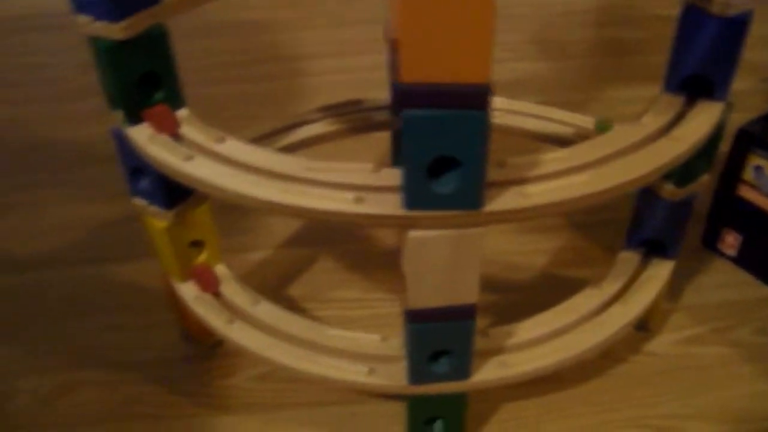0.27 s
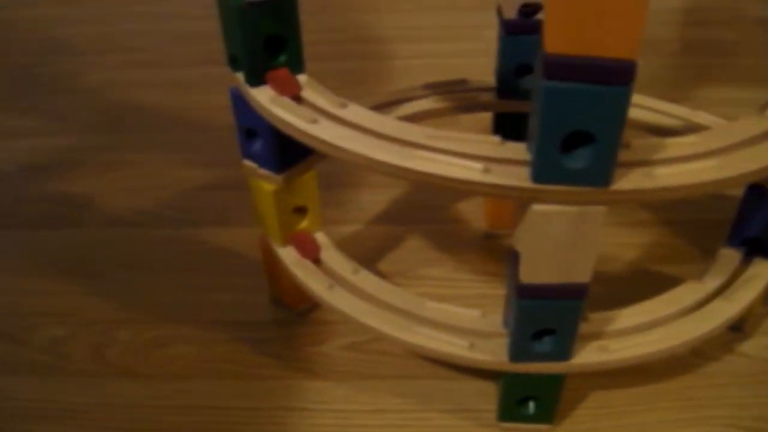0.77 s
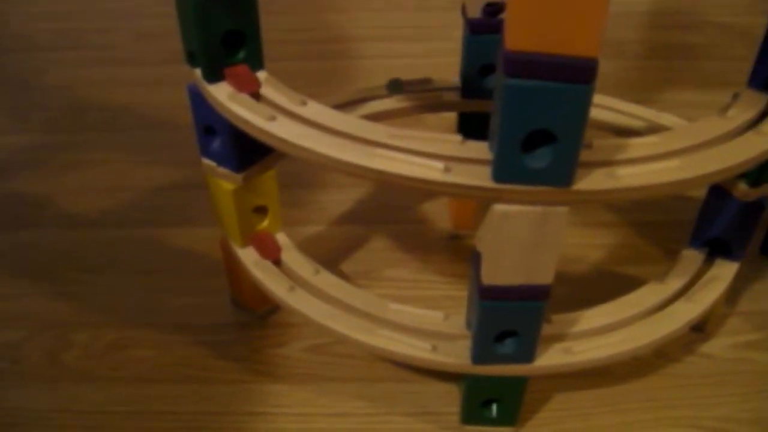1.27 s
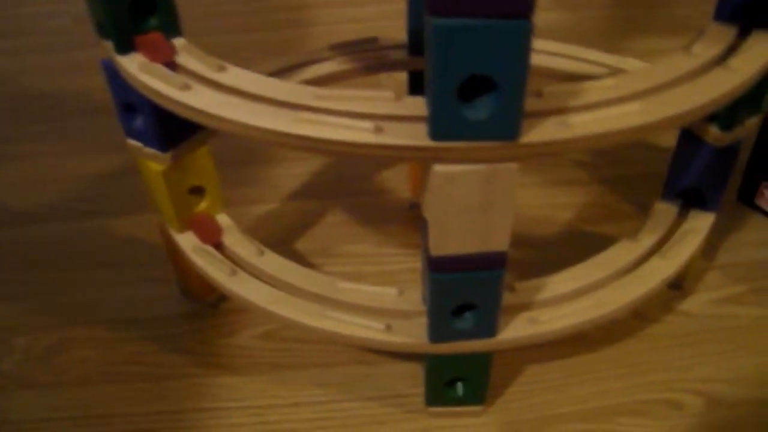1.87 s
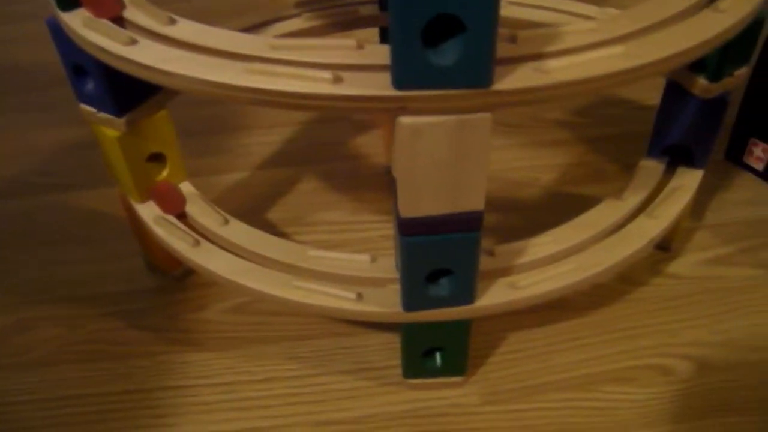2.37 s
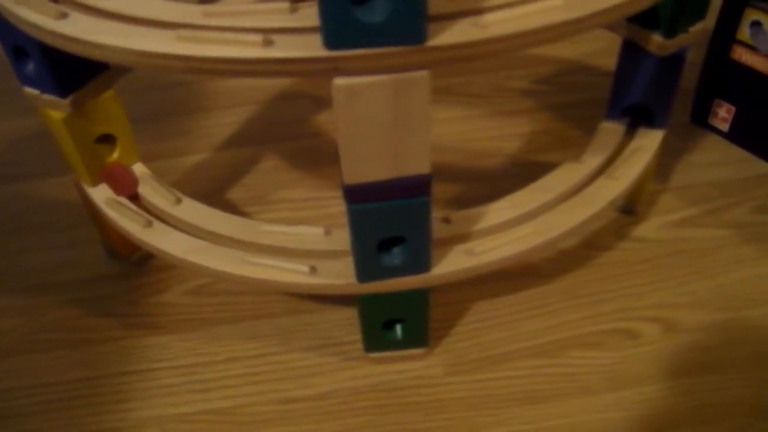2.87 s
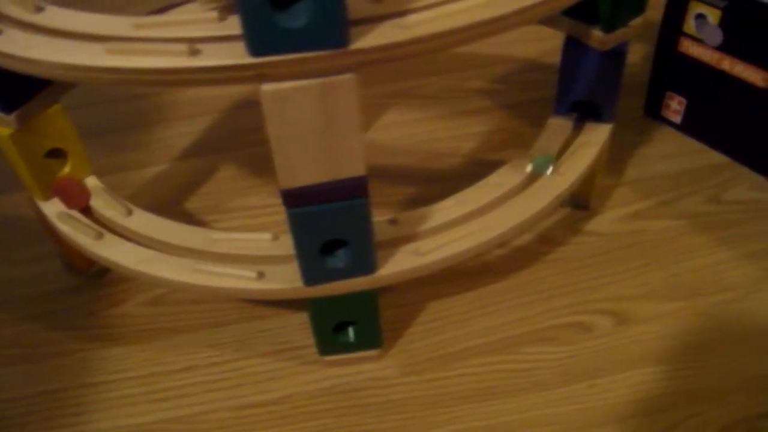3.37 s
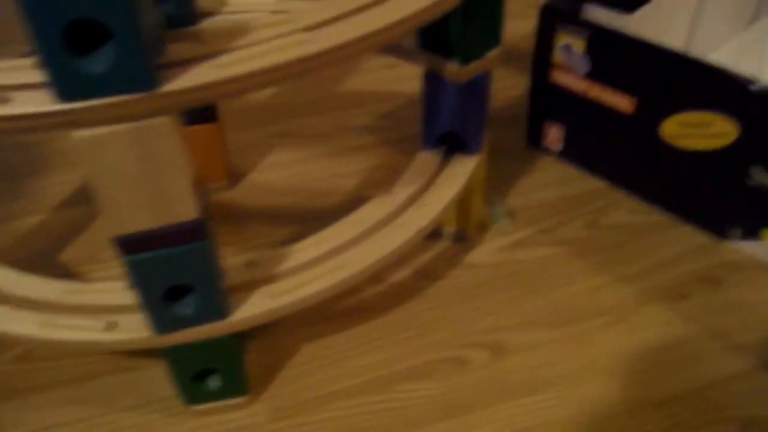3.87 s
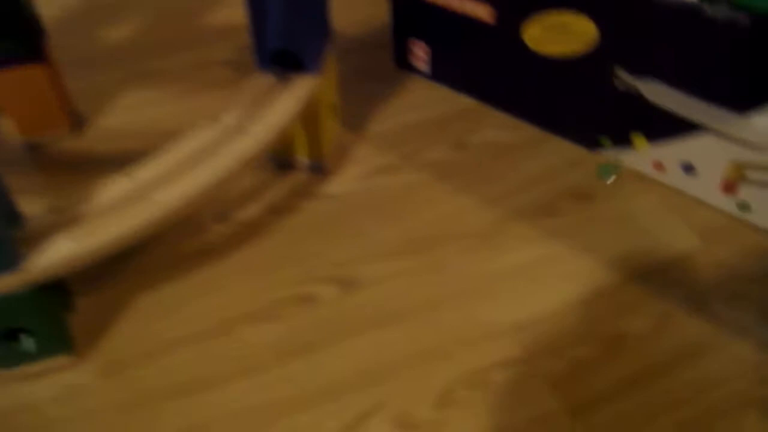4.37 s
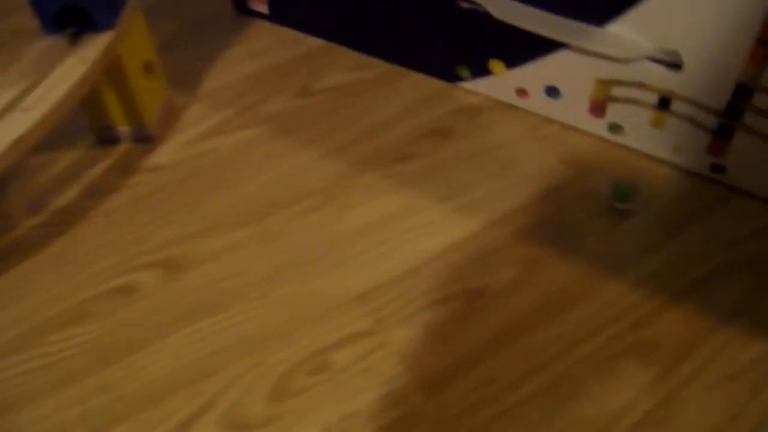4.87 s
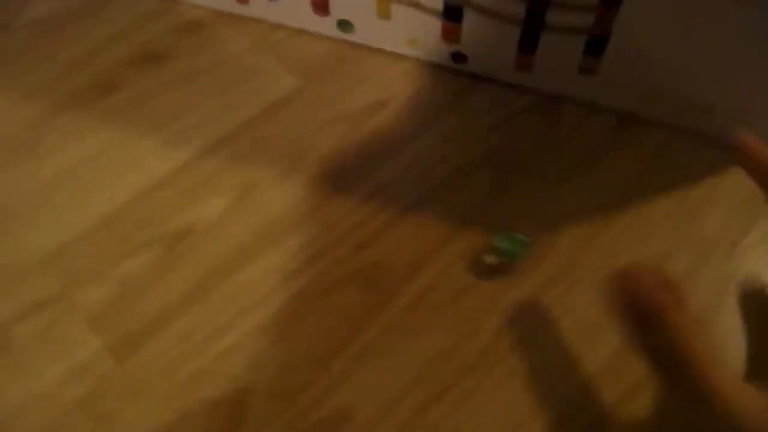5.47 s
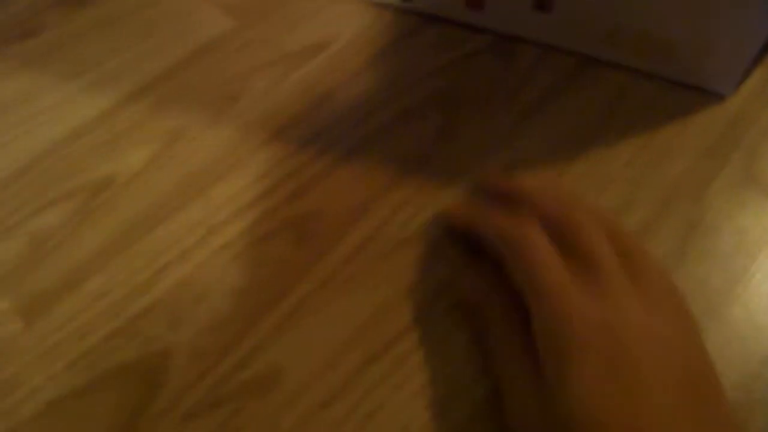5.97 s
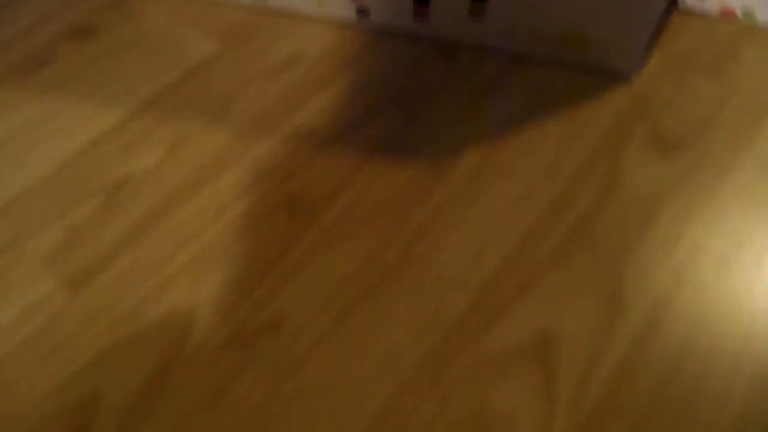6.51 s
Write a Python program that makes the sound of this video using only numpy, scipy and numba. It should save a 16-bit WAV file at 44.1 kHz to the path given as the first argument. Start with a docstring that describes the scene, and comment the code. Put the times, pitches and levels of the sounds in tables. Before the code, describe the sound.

Wooden knocks and soft hollow rolling, another clattering drop, then sharp floor bounces and a loud gritty marble roll, ended by a hand's thump and rustle.

```python
"""In a bare room a glass marble runs down a wooden marble run and out onto a laminate floor.
Grain-shaken resonances make the rumble of the curved rails; short bursts of filtered noise make the knocks on
their sides, the drops through hollow blocks and the floor bounces. Trains of tiny hops, with moving echoes off
a cardboard box and the plank's edge, make the floor roll; then a hand snatches the marble up.
A mono camera ducks and clips on the hard hits, so the room's ring swells back after each."""
import sys
import numpy as np
from scipy import signal
from scipy.fft import rfft, irfft, next_fast_len
from scipy.io import wavfile
from scipy.ndimage import map_coordinates
from numba import njit

SR = 44100
rng = np.random.default_rng(int(sys.argv[2]) if len(sys.argv) > 2 else 0)


def to_wav(s):
    """Save 16-bit WAV."""
    ch = np.atleast_2d(s).T  # columns
    pcm = np.round(np.clip(ch, -1, 1) * 32767)  # PCM
    wavfile.write(sys.argv[1], SR, pcm.astype(np.int16))


N = 297231  # samples

# Spectrum of the room's quiet air. Each row: frequency in Hz, relative density in dB per Hz.
AIR = [(25, -5), (100, -5.5), (230, 0), (550, 3.5), (1000, 4), (2000, -13.5), (4000, -12.5), (10000, -18),
       (16000, -17)]
# Reverberation of the bare walls. Each row: frequency in Hz, 60 dB decay time in seconds.
ROOM_DECAY = [(200, 0.46), (800, 0.51), (2000, 0.67), (5500, 0.5), (9000, 0.29), (15000, 0.28)]
# Spectrum of rubbed cloth. Each row: frequency in Hz, relative density in dB per Hz.
CLOTH = [(300, -22.5), (600, 7), (950, -4), (1400, 7.5), (2100, -3.5), (4300, -8.5), (9000, -14),
         (15000, -24)]
# Strokes of the reaching arm's sleeve. Each row: start in seconds, loudest moment in seconds, end in seconds,
# level at the loudest moment in dB, fade to either side in dB a second.
SLEEVE_STROKES = [(5.96, 6.191, 6.35, -23, 131), (6.332, 6.548, 6.78, -37.5, 55)]
# Scuff of the marble under the fingers. One row, with the columns of the sleeve strokes.
SCUFF = (6.18, 6.22, 6.335, -22, 45)

# Landing rate of the skipping marble. Each row: time in seconds, rate in hops a second,
# scatter as a share of one hop.
HOPS = [(4.2, 85, .3), (4.42, 110, .25), (4.5, 120, .04), (4.68, 108, .04), (4.76, 125, .2),
        (4.93, 148, .12), (5.15, 140, .25), (5.45, 46, .15), (5.95, 37, .1)]
# Surges and lulls of the rolling marble. Each row: time in seconds, level of the rumble in dB,
# level of the grit in dB.
ROLL_LEVELS = [(4.15, -23, -14), (4.25, -26.5, -25), (4.345, -11, -16.5), (4.368, -20, -28),
               (4.405, -17, -21.5), (4.66, -10, -11), (4.745, -18.5, -24), (4.8, -13, -16),
               (4.945, -16.5, -21.5), (5.01, -23, -28.5), (5.06, -19, -21.5), (5.175, -20.5, -25.5),
               (5.2, -30.5, -37), (5.225, -22.5, -25.5), (5.25, -26, -39), (5.28, -25, -25),
               (5.35, -26.5, -33.5), (5.44, -31, -39.5), (5.47, -24.5, -30), (5.57, -30, -45.5),
               (5.64, -23, -29), (5.77, -26.5, -36.5), (5.81, -24, -29.5), (5.891, -30.5, -42),
               (5.93, -44, -29)]
# Spectra of the fast and the slow roll. Each row: frequency in Hz, relative density in dB per Hz.
FLOOR_FAST = [(59, -69), (100, -33), (236, -34), (274, -27.5), (462, -13), (558, -2.5), (849, -7),
              (1530, -8), (2200, -13.5), (2470, -5.5), (2920, -8), (3400, -3), (5150, -22), (6350, -23.5),
              (8000, -32), (15000, -47.5)]
FLOOR_SLOW = [(88, -48), (150, -44), (280, -35), (485, -5.5), (726, -6.5), (830, -5.5), (1380, -17),
              (1600, -15), (1820, -22), (2530, -12), (3350, -9), (3800, -11.5), (4100, -23), (5260, -20),
              (6320, -29), (12000, -43.5), (15600, -68), (22000, -120)]
# Resonances of the floor boards. Each row: frequency in Hz, width in Hz, relative level in dB.
BOARDS = [(584, 68, 3.5), (1228, 43, -5), (1544, 84, -6.5), (2470, 110, -1), (2640, 70, -2), (3230, 110, 3),
          (3336, 66, -2), (3430, 56, -7)]
# Echoes off the box. Each row: delay in ms at ECHO_FROM_S, growth in ms a second, strength from 0 to 1.
BOX_ECHOES = [(.57, .42, .16), (.8, .55, .2)]

# Spectrum of the snap of a bent plank. Each row: frequency in Hz, relative density in dB per Hz.
FLEX = [(200, -54), (500, -30), (1500, -23), (2500, -3), (3600, 7.5), (4600, -1), (6300, -8), (8000, -27),
        (15000, -29)]
# Resonances of the struck plank. Each row: frequency in Hz, width in Hz, relative level in dB.
PLANK = [(1110, 910, -3), (1970, 210, 2.5), (2680, 250, 0), (3730, 1550, 4.5), (4330, 780, 7.5),
         (4940, 920, 0)]
# Later bounces and blows of the marble on the floor. Each row: time in seconds, blow in dB,
# thud in dB re the blow.
FLOOR_BLOWS = [(4.184, -5, -12), (4.2034, -5, -2.5), (4.222, -10.5, -7), (4.344, -11, 3.5), (4.355, 2, 0.5),
               (4.423, -10, 5), (4.533, -4, 2), (4.6015, -5, -10), (4.661, -5, -16), (4.928, -13, -15),
               (5.043, -17, -5), (5.065, -17, -4), (5.224, -23, 4), (5.2682, -17, -13), (5.403, -20, 2.5),
               (5.455, -20, 3), (5.555, -23.5, 8)]
# Judder of the slow marble. Each row: time in seconds, level in dB.
JUDDERS = [(5.7952, -10.5), (5.8276, -11), (5.862, -11), (5.8944, -11), (5.903, -7), (5.91, -2.5),
           (5.9647, -7.5)]
# Fingers press the marble down. Each row: time in seconds, blow in dB, thud in dB re the blow.
GRAB = [(6.139, 4, -3.5), (6.159, 1.5, -8), (6.1718, -1, -3), (6.192, -9, -8), (6.322, -43, -5)]
# Small bright ticks. Each row: time in seconds, level in dB.
TICK_TIMES = [(1.507, -29.5), (1.566, -32.5), (5.318, -13.5)]
# Spectrum of a tick. Each row: frequency in Hz, relative density in dB per Hz.
TICK = [(300, -42), (2000, 5), (5000, -2.5), (8000, -2), (10500, 1), (13000, -6), (16000, -14.5)]

# Hollow tones of three rails. Each row: frequency in Hz, width in Hz, relative level in dB.
UPPER_RAIL = [(450, 110, -17), (630, 80, -1), (780, 100, 1.5), (870, 80, -1), (1450, 300, -16),
              (2600, 1200, -33)]
MIDDLE_RAIL = [(490, 138, 2.5), (659, 130, 2), (870, 370, -4), (1470, 430, -7.5), (2450, 15000, -25.5)]
LOWER_RAIL = [(469, 55, 5), (595, 114, -4), (930, 970, -18), (1650, 780, -21), (3000, 5000, -38)]
# Stretches of rail. Each row: start in seconds, reference moment in seconds, end in seconds, level at the
# reference moment in dB, fade to either side of it in dB a second (negative grows), resonances of the rail.
STRETCHES = [(.29, 0.35, 0.66, -34.5, 5, MIDDLE_RAIL), (0.63, 1.014, 1.36, -32, 17, UPPER_RAIL),
             (1.303, 1.66, 2.28, -37.5, 14, MIDDLE_RAIL), (2.362, 2.424, 2.72, -27.5, 75, MIDDLE_RAIL),
             (2.576, 2.984, 3.17, -33, -1, MIDDLE_RAIL), (3.174, 3.356, 3.57, -30.5, 11, LOWER_RAIL),
             (3.57, 3.6, 4.06, -42.5, -2, MIDDLE_RAIL), (3.732, 3.76, 3.78, -29, 35, LOWER_RAIL)]
# Fine ticking of the glass close to the microphone. One row: start in seconds, reference moment in seconds,
# end in seconds, level at the reference moment in dB, fade away from it in dB a second.
NEAR_PASS = (3, 4.5, 3.5, -50.5, 1)
# Resonances of that near glass. Each row: frequency in Hz, width in Hz, relative level in dB.
NEAR_GLASS = [(3160, 260, 3), (4020, 500, -4), (5170, 1200, -3), (7300, 810, -4), (9550, 630, -15)]
# Knocks against the rails. Each row: time in seconds, blow in dB, thud in dB re the blow.
KNOCKS = [(.008, -17, -0.5), (.704, -25.5, 4), (.755, -22.5, -2.5), (.884, -21, 7), (0.921, -30, 6),
          (.985, -45, 2), (1.003, -26, -6), (1.0315, -30, 5), (1.047, -26, 2), (1.056, -5.5, -8),
          (1.073, -21, -7), (1.215, -25, 3), (1.57, -25, -7), (1.892, -46.5, 21.5), (1.9945, -35, 10.5),
          (2.2642, -45, 21), (2.275, -35, 8), (2.291, -36, 10), (2.9305, -17, 7.5), (2.949, -20.5, 6),
          (2.982, -20, -1), (2.996, -27, 9), (3.014, -31, 3), (3.0472, -9.5, -4), (3.071, -17.5, 1.5),
          (3.09, -17, -9), (3.119, -22, -2), (3.379, -26.5, 0), (3.456, -31, -3), (3.699, -23, -1),
          (3.739, -18.5, -0.5), (3.754, -32, 8)]

# Drops inside the blocks. Each row: time in seconds, blow in dB, hardness in dB,
# list of rings, each a frequency in Hz and a level in dB re the blow.
DROPS = [(0.0402, -11.5, -7, [(1760, -4)]), (.054, -30, -13, [(610, 7)]), (.118, 0.5, 1.5, [(3800, -4),
         (7450, -1)]), (0.1219, 1, 6, [(3500, -22), (5300, -6)]), (.167, -14, -4.5, [(3000, -1)]),
         (.27, 3.5, -7, [(720, -4.5)]), (.296, -16, -1, [(2950, 1)]), (.336, -13, -6.5, [(1170, 1)]),
         (.361, -21.5, -15, []), (0.377, -29, 2, []), (2.3333, -18, -1.5, [(1740, 8.5), (5900, 0),
         (12200, -15)]), (2.369, -11.5, -4, [(2150, -2), (5900, -5)]), (2.381, -23.5, -18, [(5900, -7)]),
         (2.3944, -1.5, -4, [(5800, 3.5), (6300, -12)]), (2.3995, -3.5, -5.5, [(5950, 3), (6350, 1)]),
         (2.4245, -10, -7, [(5970, -7)]), (2.459, -23, -8, [(600, -2)]), (2.5384, -5.5, 5, [(3500, 2.5),
         (5850, 2), (7350, 1), (9600, -5)]), (2.556, -16, 2, [(6100, 6)]), (2.565, -11, 1, [(3700, 2),
         (5200, -1)]), (2.587, 2, -1, [(2900, -2.5), (4650, -10.5)]), (3.781, -5.5, -4.5, [(5650, 1.5),
         (7200, 4), (8750, -6)]), (3.801, -22, -10, [(5650, -2)]), (3.828, -8.5, -5, [(7250, -9),
         (8750, -21)]), (3.841, -18.5, -20, [(583, 0)]), (3.868, 2.5, -6, [(3400, -3), (6800, -6),
         (11900, -7)]), (3.88, -15, -16.5, [(810, -4)]), (3.916, -18.5, -15.5, [(534, 2)])]
# Resonances of the wood, and of the hollow under it.
# Each row: frequency in Hz, width in Hz, relative level in dB.
WOOD = [(900, 3900, 6), (1422, 240, 13.5), (1610, 310, 11), (2020, 730, 9.5), (3060, 450, 5.5),
        (4040, 77, -10), (4520, 2600, 2.5)]
HOLLOW = [(452, 87, -5), (614, 185, 3), (726, 690, -7.5)]
# Spectrum of the glass click. Each row: frequency in Hz, relative density in dB per Hz.
GLASS = [(1500, -42.5), (3500, 4.5), (5500, -1), (7300, 0), (9000, -11), (13000, -22), (16000, -40)]

BLOW = 2048  # samples in one blow
EDGE_S = 0.07  # a stretch or stroke starts and stops within this time
SETTLE_S, SETTLING_S = 5.136, 0.32  # the marble stops skipping: when, over how long
SPOT_S = 0.16  # the marble reaches a spot with a new answer after this time
RATTLE_S = 0.002  # time constant of the plank's answer to a hop
ECHO_FROM_S = 4.6  # the echo delays hold at this time
EDGE_ECHO_MS, EDGE_ECHO_MS_PER_S, EDGE_ECHO_SHARE = 1.14, 0.46, 0.2  # delay at 1 kHz, growth, strength
BOX_ECHO_ABOVE_HZ = 4500
LANDING_S, FIRST_FLIGHT_S, FLIGHT_SHRINK = 3.981, 0.091, 0.614  # each flight over the one before
LANDING_DB, BOUNCE_LOSS_DB = 19, 4.5
JUDDER_THUD_DB = -6.5  # re the judder
GRAB_TOP_HZ = 3530  # the fingers damp its treble
SWAY_DB, SWAYS_PER_S = 1.4, 18  # the marble presses unevenly on the rails
RAIL_TICK_DB = -19.5  # specks in the wood, re the rumble
UPPER_RAIL_END_S = 1.25
KNOCK_TOP_HZ = 2480  # a glancing contact lasts longer and has less treble
THUD_DB, CLICK_DB = -6, -3.5  # re the blow, at hardness 0
THUD_PER_HARDNESS = -1.09  # a harder contact clicks more and thuds less
RING_WIDTH, RING_T60_S = 0.1, 0.013  # width as a share of the pitch, decay of the excitation
TOP_HZ = 15900  # band limit of the camera


def amp(db):
    """Level law: decibels to amplitude gain."""
    return 10 ** (np.asarray(db) / 20)


def unit(x):
    """Normalization to an rms value of 1."""
    return x / np.sqrt(np.mean(x ** 2) + 1e-20)


def along(points, hz):
    """Interpolation of (Hz, value) points on a logarithmic frequency axis."""
    f, v = np.transpose(points)
    return np.interp(np.log(hz + 1), np.log(f + 1), v)


def filtered(x, response):
    """Linear filtering: the spectrum is multiplied by a complex response of frequency."""
    m = 2 * next_fast_len(len(x) // 2 + BLOW)
    hz = np.fft.rfftfreq(m, 1 / SR)
    return irfft(rfft(x, m) * response(hz), m)[:len(x)]


def colour(points):
    """Minimum phase: folding the cepstrum gives the causal response with a given spectrum."""
    def response(hz):
        cepstrum = irfft(np.log(amp(along(points, hz)) + 1e-6))
        half = len(cepstrum) // 2
        cepstrum[1:half] *= 2
        cepstrum[half + 1:] = 0
        return np.exp(rfft(cepstrum))
    return response


def body(modes):
    """Modal superposition: damped resonances that radiate little below and above themselves."""
    def band(hz, centre, width):
        return 1j * hz * width / (centre * centre - hz * hz + 1j * hz * width)

    def response(hz):
        total = 0
        for k, (centre, width, db) in enumerate(modes):
            resonance = band(hz, centre, width) * band(hz, centre, centre)
            total = total + (-1) ** k * amp(db) * resonance
        return total
    return response


def soften(x, top_hz):
    """Contact time: a soft contact acts as a second-order low-pass, so treble falls away above top_hz."""
    return filtered(x, lambda hz: 1 / (1 + 1.2j * hz / top_hz - (hz / top_hz) ** 2))


def diffuse(x):
    """Directional averaging: summed over all directions, a spectrum's peaks and dips even out."""
    spectrum = rfft(x)
    k = np.arange(len(spectrum))
    lo = (k / 1.2).astype(int)
    hi = np.minimum((k * 1.2).astype(int) + 1, len(k))
    energy = np.append(0, np.cumsum(abs(spectrum) ** 2))
    smooth = np.sqrt(abs(energy[hi] - energy[lo]) / (hi - lo))
    return irfft(smooth * np.exp(1j * np.angle(spectrum)))


def add(track, s, sound):
    """Superposition: a sound is mixed in at time s."""
    start = max(round(s * SR), 0)
    track[start:start + len(sound)] += sound[:N - start]


def swell(start, reference, end, db, fade_db_per_s):
    """Exponential gain: the level changes evenly in dB to either side of a reference moment."""
    t = np.arange(N) / SR
    gate = np.clip(np.minimum(t - start, end - t) / EDGE_S + 0.5, 0, 1)
    return gate * amp(db - fade_db_per_s * abs(t - reference))


def burst(response, t60):
    """Transient excitation: decaying noise drives a response, with the energy of 1 ms at full scale."""
    t = np.arange(BLOW) / SR
    shake = filtered(rng.standard_normal(BLOW) * amp(-60 * t / t60), response)
    return unit(shake) * np.sqrt(SR / 1000 / BLOW)


def blow(modes, thud_db, click_db, t60):
    """Impact: contact cracks, surface clacks and shivers on, the hollow under it thuds, glass clicks."""
    crack = amp(-8.5) * burst(body([(2480, 1900, 0)]), t60=0.0021)
    clack = amp(-1.5) * burst(body(modes), t60)
    shiver = amp(-5.0) * burst(body(modes), t60=0.044)
    thud = amp(thud_db) * burst(body(HOLLOW), t60=0.014)
    click = amp(click_db) * burst(colour(GLASS), t60=0.014)
    return crack + clack + shiver + thud + click


def bumps(rate, spread_db):
    """Shot noise: a rolling ball meets random tiny impacts, rate a second, of uneven size."""
    hit = rng.random(N) < rate / SR
    size = amp(spread_db * np.clip(rng.standard_normal(N), -2, 2))
    return unit(hit * size)


def quiet_air():
    """Background noise: stationary random pressure with a fixed spectrum."""
    return amp(-47.0) * unit(filtered(rng.standard_normal(N), colour(AIR)))


def room(x):
    """Reverberation: bare walls ring on with decaying noise; the echo pattern changes as the marble moves."""
    out = np.zeros(N)
    step = SR // 3
    for start in range(0, N, step):
        hz, t, z = signal.stft(rng.standard_normal(2 * step), SR, nperseg=256)
        build_up = 1 - np.exp(-t / 0.0006)
        decay = amp(-60 * t / along(ROOM_DECAY, hz)[:, None])
        tail = signal.istft(z * build_up * decay, SR, nperseg=256)[1]
        tail = tail / np.linalg.norm(tail)
        add(out, start / SR, signal.fftconvolve(x[start:start + step], tail))
    return out


def hand():
    """Friction noise: a sleeve rustles and the fingers drag the marble off the floor."""
    rustle = unit(filtered(rng.standard_normal(N), colour(CLOTH)))
    sleeve = sum(swell(*stroke) for stroke in SLEEVE_STROKES) * rustle
    drag = [(463, 49, 12.5), (696, 260, 0.5), (1330, 250, -11), (3040, 2800, -14.5)]  # (Hz, width Hz, dB)
    scuff = swell(*SCUFF) * unit(filtered(bumps(rate=540, spread_db=-6.0), body(drag)))
    return sleeve + scuff


def hops(spread_db):
    """Jittered pulse train: the skipping marble lands now regularly, now scattered, with uneven force."""
    s, rate, scatter = np.transpose(HOPS)
    t = np.arange(N) / SR
    phase = np.cumsum(np.interp(t, s, rate)) / SR
    shift, force = rng.standard_normal((1200, 2)).T
    count = np.arange(len(shift))
    due = np.interp(count, phase, t)
    when = np.interp(count + np.interp(due, s, scatter) * shift, phase, t)
    size = amp(spread_db * force) / np.sqrt(np.interp(when, s, rate)) * (when < t[-1])
    return unit(np.bincount((when * SR).astype(int), size, N)[:N])


def plank_rattle(landings):
    """Local impulse response: hops on one spot draw the same short answer, which changes along the plank."""
    out, step = np.zeros(N), int(SPOT_S * SR)
    decay = np.exp(-np.arange(BLOW // 4) / (RATTLE_S * SR))
    for start in range(0, N - 2 * step, step):
        here = landings[start:start + 2 * step] * np.sqrt(np.hanning(2 * step))
        answer = diffuse(decay * rng.standard_normal(len(decay)))
        add(out, start / SR, signal.fftconvolve(here, unit(answer)))
    return unit(out)


def roll_echoes(x):
    """Comb interference: echoes off plank edge and box lag more and more, so bright bands slide downwards."""
    hz, t, z = signal.stft(x, SR, nperseg=512, noverlap=384)
    hz, rolled_s = hz[:, None], t - ECHO_FROM_S
    # in the plank the bass travels more slowly than the treble
    edge_ms = EDGE_ECHO_MS + EDGE_ECHO_MS_PER_S * rolled_s
    gain = 1 + EDGE_ECHO_SHARE * np.exp(-4j * np.pi * edge_ms * np.sqrt(hz / 1000))
    treble = 1 - 1 / (1 + (hz / BOX_ECHO_ABOVE_HZ) ** 4)
    for ms, ms_per_s, share in BOX_ECHOES:
        delay_s = (ms + ms_per_s * rolled_s) / 1000
        gain = gain + share * treble * np.exp(-2j * np.pi * hz * delay_s)
    return signal.istft(z * gain, SR, nperseg=512, noverlap=384)[1][:N]


def floor_roll():
    """Rolling contact: hops excite embossed laminate; slowing, they settle, grit fades, tone turns hollow."""
    t = np.arange(N) / SR
    slowness = np.clip((t - SETTLE_S) / SETTLING_S, 0, 1)
    landings = hops(spread_db=1.2)
    # bending waves carry treble faster than bass, which spreads each tap
    skips = filtered(landings, lambda hz: np.exp(-1j * np.sqrt(hz / 2)))
    rattle = plank_rattle(landings)
    grain = bumps(rate=2000, spread_db=2)
    taps = amp(-3) * skips + rattle + amp(-8) * grain
    settled = amp(-4) * rattle + grain

    boards = unit(filtered(hops(spread_db=1), body(BOARDS)))
    fast = unit(filtered(taps, colour(FLOOR_FAST))) + amp(-7) * boards
    # a thin ring comes through once the grit has faded
    thin_ring = unit(filtered(settled, body([(5500, 140, 0)])))
    slow = unit(filtered(settled, colour(FLOOR_SLOW))) + amp(-19) * thin_ring
    sound = roll_echoes(np.sqrt(1 - slowness) * unit(fast) + np.sqrt(slowness) * unit(slow))

    rumble = filtered(sound, lambda hz: 1 / (1 + (hz / 2300) ** 8))
    grit = sound - rumble
    s, rumble_db, grit_db = np.transpose(ROLL_LEVELS)
    rumble_gain = amp(np.interp(t, s, rumble_db, left=-120, right=-120))
    grit_gain = amp(np.interp(t, s, grit_db, left=-120, right=-120))
    return rumble_gain * unit(rumble) + grit_gain * unit(grit)


def flex():
    """Bending-wave dispersion: a hard landing bends the plank in one smooth snap whose treble arrives first."""
    push = np.zeros(BLOW)
    push[0] = 1
    snap = filtered(push, lambda hz: colour(FLEX)(hz) * np.exp(-1j * np.sqrt(hz / 0.8)))
    return unit(snap) * np.sqrt(SR / 1000 / BLOW)


def bounces(out):
    """Restitution: flight times shrink by a constant ratio and each landing is weaker than the last."""
    for k in range(4):
        s = LANDING_S + FIRST_FLIGHT_S * (1 - FLIGHT_SHRINK ** k) / (1 - FLIGHT_SHRINK)
        strike = blow(PLANK, thud_db=-12.5 + 4.9 * k, click_db=-19, t60=0.041)
        add(out, s, amp(LANDING_DB - BOUNCE_LOSS_DB * k) * (flex() + amp(-4.5) * strike))


def judder(out):
    """Repeated impact: the slow marble judders, each contact a buzz over a hollow thud."""
    buzz_modes = [(1770, 530, 10.5), (3270, 6500, -11.5)]  # (Hz, width Hz, dB)
    for s, db in JUDDERS:
        buzz = amp(-3.5) * burst(body(buzz_modes), t60=0.062)
        thud = amp(JUDDER_THUD_DB) * burst(body(HOLLOW), t60=0.066)
        add(out, s, amp(db) * (buzz + thud))


def impacts():
    """Impact excitation: first and later bounces and blows, a judder, the damped grab and bright ticks."""
    out = np.zeros(N)
    bounces(out)
    for s, db, thud_db in FLOOR_BLOWS:
        add(out, s, amp(db) * blow(PLANK, thud_db, click_db=-40, t60=0.026))
    # one low, hollow knock
    add(out, 4.515, amp(-12) * burst(body([(285, 40, 0)]), t60=0.08))
    judder(out)
    for s, db, thud_db in GRAB:
        press = blow(PLANK, thud_db, click_db=-6, t60=0.11)
        add(out, s, amp(db) * soften(press, GRAB_TOP_HZ))
    for s, db in TICK_TIMES:
        add(out, s, amp(db) * burst(colour(TICK), t60=0.033))
    return out


def rails():
    """Roughness excitation: grain shakes each rail's hollow tones; the marble sways and ticks over specks."""
    grain = bumps(rate=700, spread_db=2)
    speck_modes = [(1450, 400, 0), (2000, 450, -2)]  # (Hz, width Hz, dB)
    specks = unit(filtered(bumps(rate=110, spread_db=2), body(speck_modes)))
    knots = np.arange(N) * SWAYS_PER_S / SR
    sway = amp(SWAY_DB * map_coordinates(rng.standard_normal(int(knots[-1]) + 2), [knots]))
    rumble = np.zeros(N)
    for *stretch, rail in STRETCHES:
        tone = unit(filtered(grain, body(rail)))
        rumble += swell(*stretch) * (tone + amp(RAIL_TICK_DB) * specks)
    fizz = swell(*NEAR_PASS) * unit(filtered(bumps(rate=70, spread_db=3), body(NEAR_GLASS)))
    return sway * (rumble + fizz)


def knocks():
    """Glancing impact: the marble sways against the sides of the curved rails in long, soft contacts."""
    out = np.zeros(N)
    for s, db, thud_db in KNOCKS:
        sound = soften(blow(WOOD, thud_db, click_db=-2.5, t60=0.039), KNOCK_TOP_HZ)
        if s < UPPER_RAIL_END_S:
            # on the far upper rail the clack is muted and the rail's own hollow tone is added
            sound = amp(-8) * sound + amp(thud_db - 0.5) * burst(body(UPPER_RAIL), t60=0.05)
        else:
            # the less a knock thuds, the more it ticks
            sound = sound + amp(-19 - 0.12 * thud_db) * burst(colour(TICK), t60=0.013)
        add(out, s, amp(db) * sound)
    return out


def blocks():
    """Modal excitation: each spot struck in the hollow blocks rings its own way; gives blows, spill, rings."""
    blows, spill, rings = np.zeros((3, N))
    for s, db, hardness_db, tones in DROPS:
        thud_db = THUD_DB + THUD_PER_HARDNESS * hardness_db
        click_db = CLICK_DB + hardness_db
        sound = amp(db) * blow(WOOD, thud_db, click_db, t60=0.025)
        add(blows, s, sound)
        add(spill, s, diffuse(sound))  # what the walls receive
        for ring_hz, ring_db in tones:
            ring = body([(ring_hz, ring_hz * RING_WIDTH, 0)])
            add(rings, s, amp(db + ring_db) * burst(lambda hz: ring(hz) ** 2, RING_T60_S))
    return blows, spill, rings


def scene():
    """Direct and reverberant fields: sources over quiet air feed the walls, except the close, dry hand."""
    air = quiet_air()
    close_hand = hand()
    rolling = floor_roll()
    struck = impacts()
    track = rails() + knocks()
    drops, spill, rings = blocks()
    to_walls = amp(-9.0) * spill + amp(-13.0) * rings + amp(-12.0) * struck
    to_walls += amp(-10.0) * track + amp(-7.0) * rolling
    direct = drops + rings + struck + track + rolling + close_hand
    return np.tile(direct + room(to_walls) + air, (2, 1))


@njit
def ducking(x, threshold, attack, release, hold):
    """Feedback compression: gain in dB dives while the output peaks over the threshold, then creeps back."""
    gain_db, peak, cut = np.zeros(len(x)), 0., 0.
    for i in range(len(x)):
        peak = max(abs(x[i]), peak * (1 - hold))
        if peak * 10 ** (-cut / 20) > threshold:
            cut += attack
        else:
            cut *= 1 - release
        gain_db[i] = -cut
    return gain_db


def record(dry):
    """Nonlinear transduction: fast gain control, soft clipping, then the camera's thin bass and band limit."""
    attack_db_per_s, release_s, hold_s = 4500, 0.04, 0.003
    attack, release, hold = attack_db_per_s / SR, 1 / (release_s * SR), 1 / (hold_s * SR)
    mono = dry[0] * amp(ducking(dry[0], amp(-7.5), attack, release, hold))
    clipped = mono / (1 + (mono / 0.7) ** 6) ** (1 / 6)
    tone = [(100, -12), (200, -8), (320, 0), (12000, 0), (16000, -5)]  # (Hz, dB)
    return np.tile(filtered(clipped, lambda hz: amp(along(tone, hz)) * (hz < TOP_HZ)), (2, 1))


dry = scene()
out = record(dry)
to_wav(out)
```